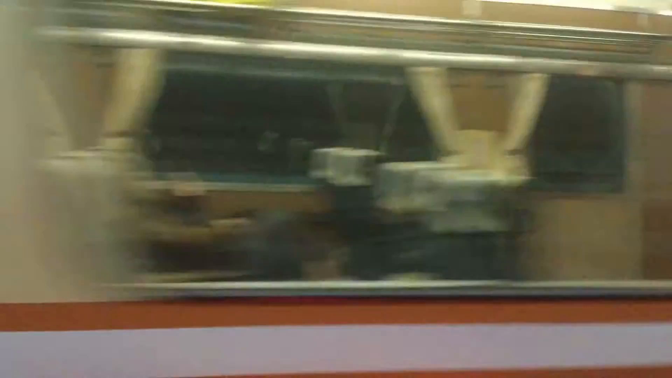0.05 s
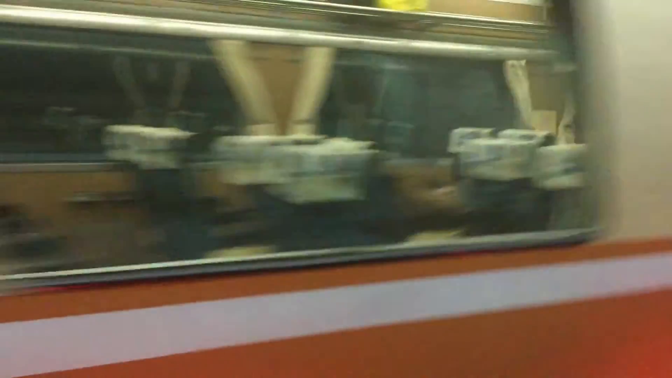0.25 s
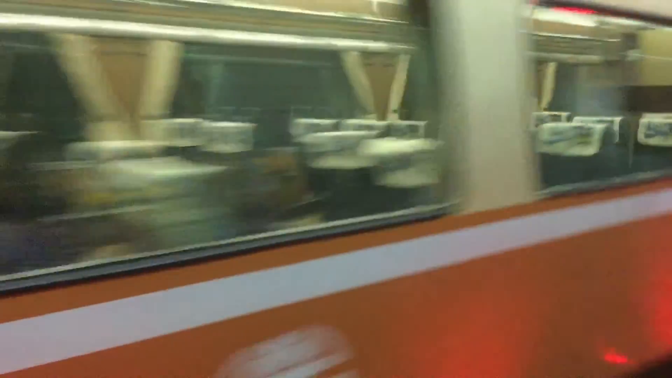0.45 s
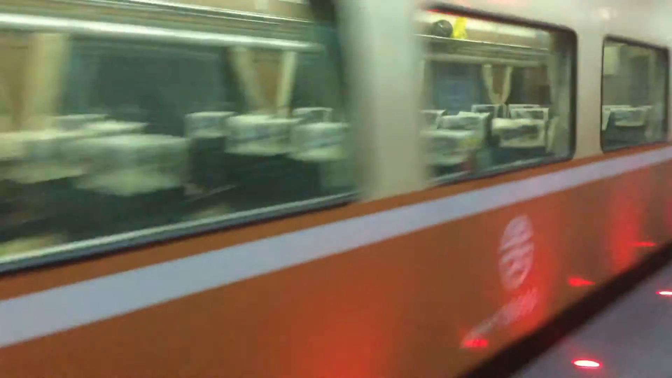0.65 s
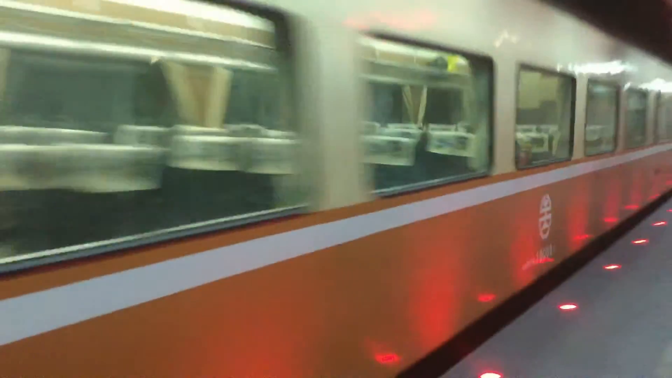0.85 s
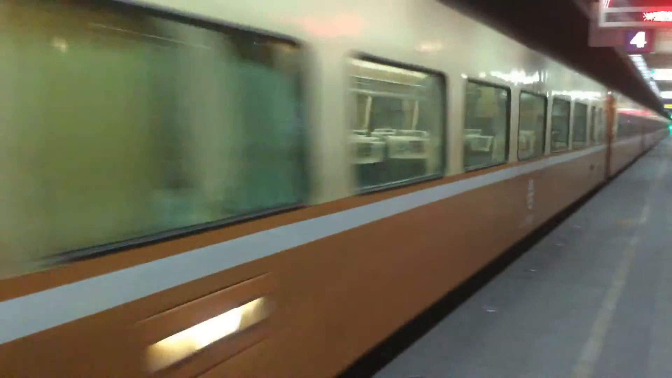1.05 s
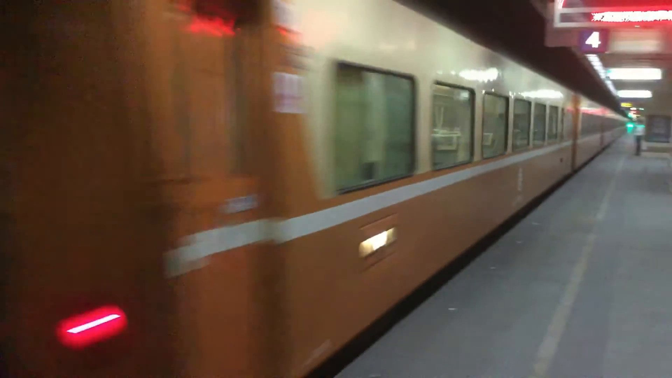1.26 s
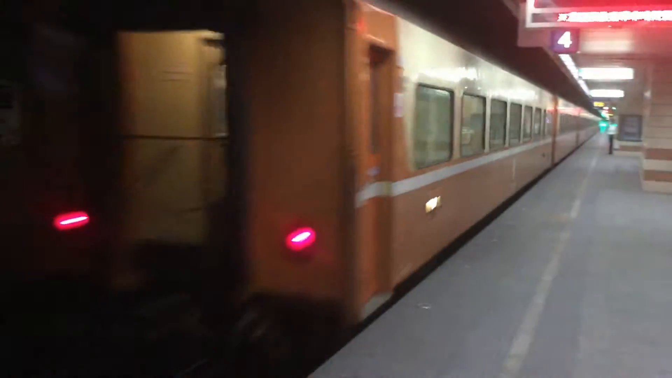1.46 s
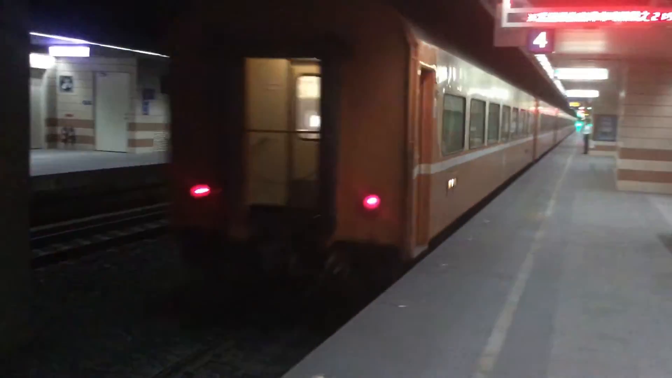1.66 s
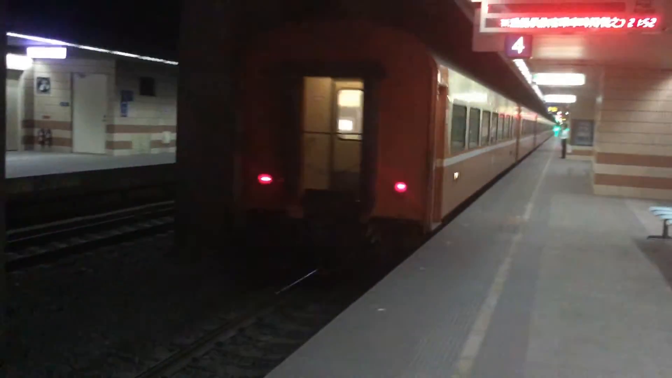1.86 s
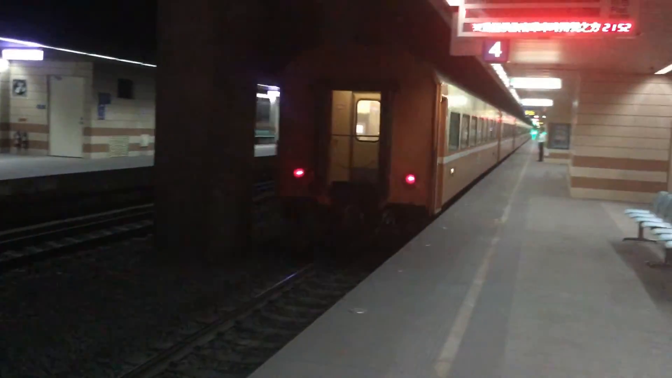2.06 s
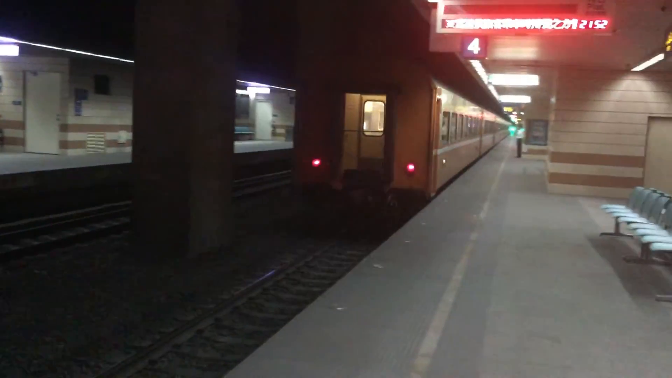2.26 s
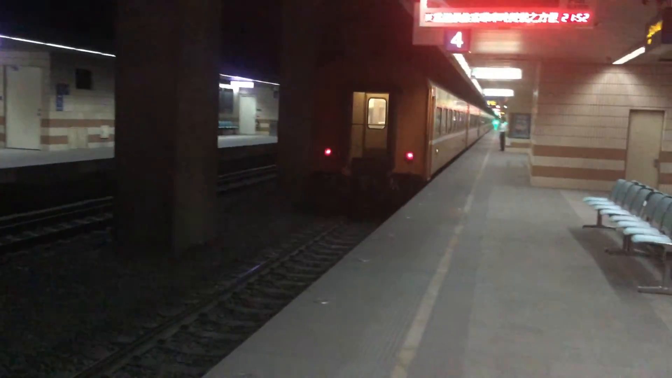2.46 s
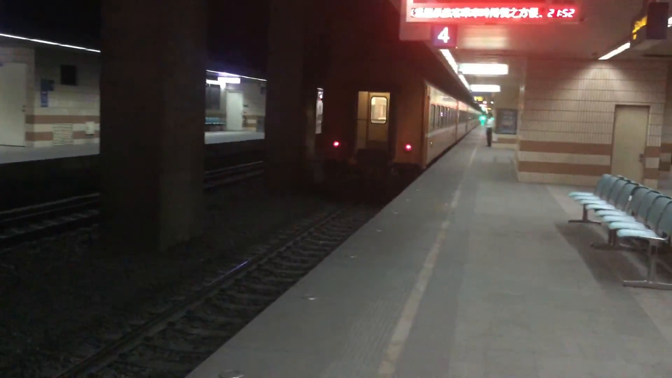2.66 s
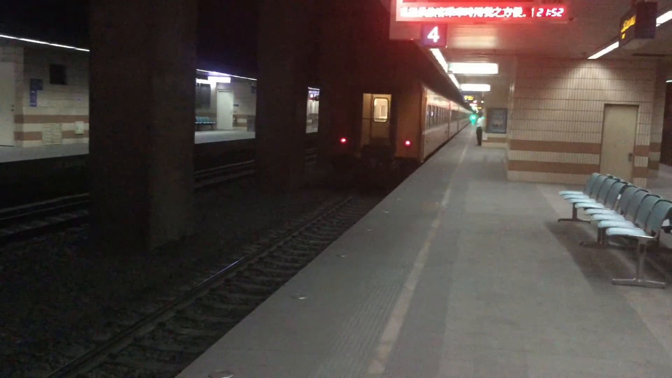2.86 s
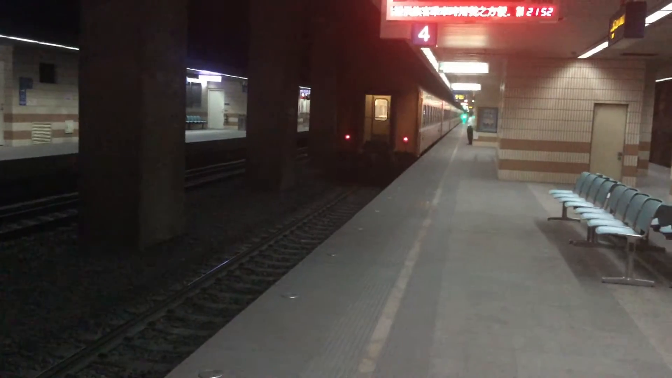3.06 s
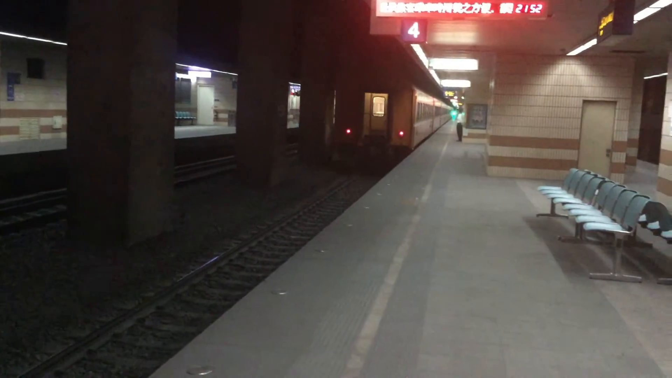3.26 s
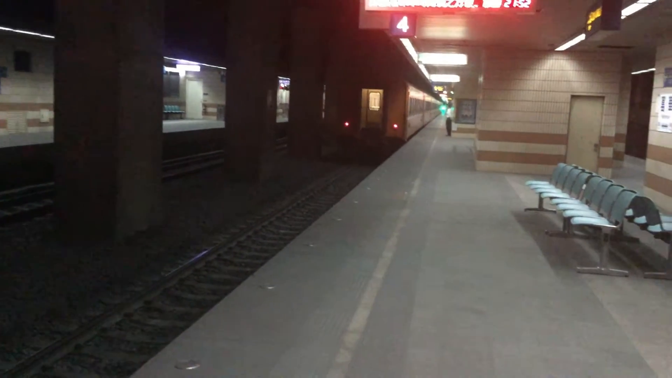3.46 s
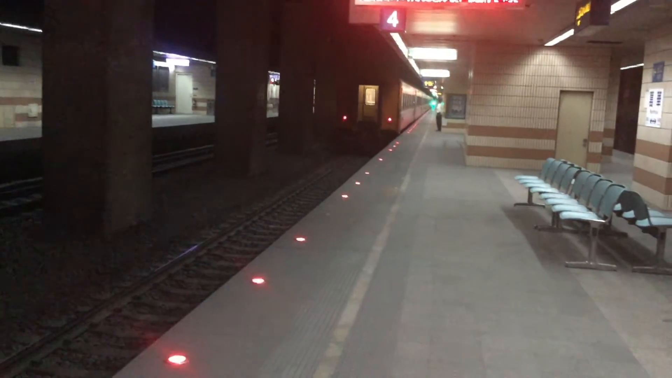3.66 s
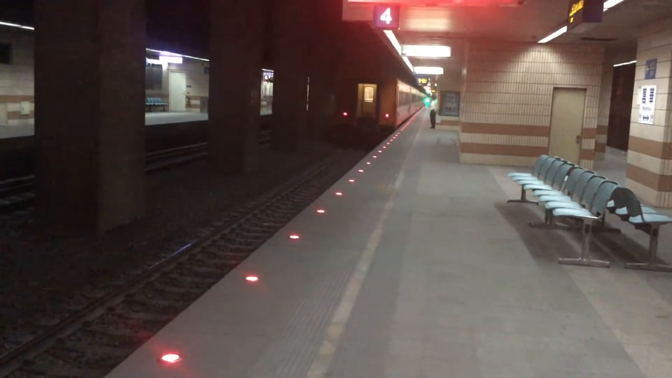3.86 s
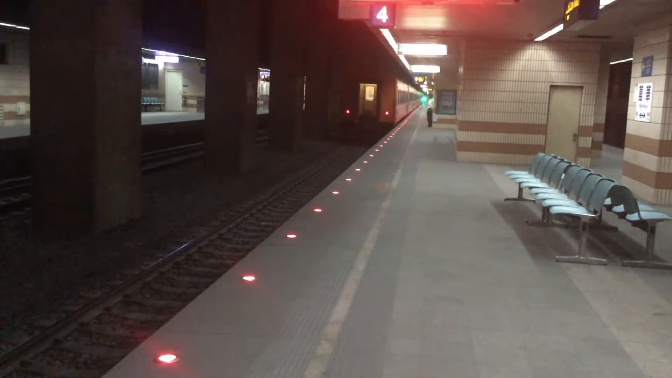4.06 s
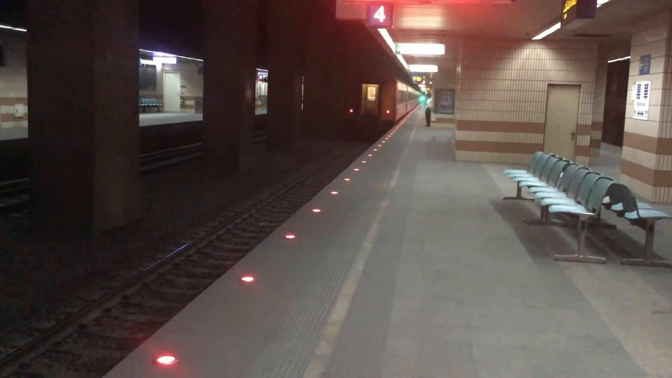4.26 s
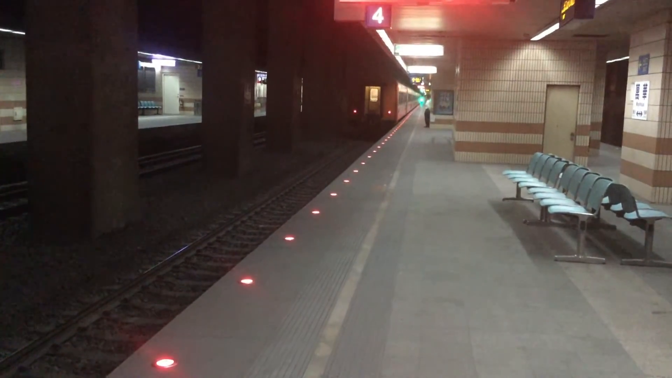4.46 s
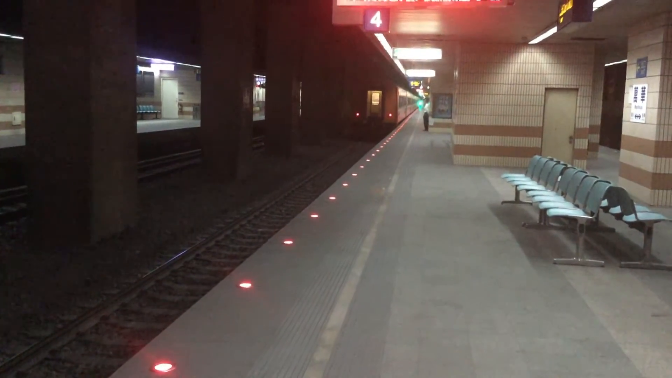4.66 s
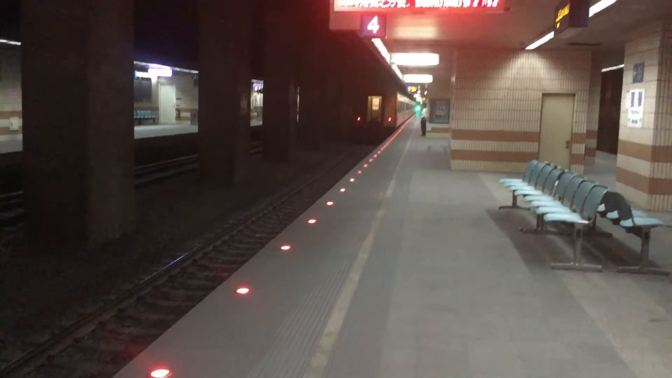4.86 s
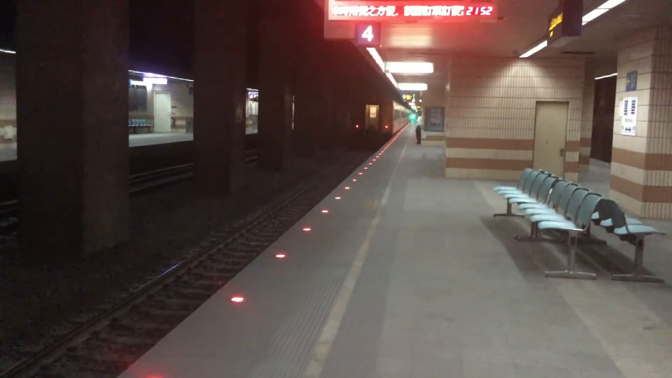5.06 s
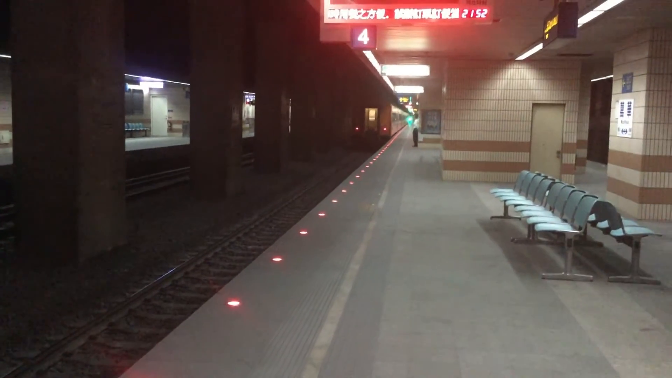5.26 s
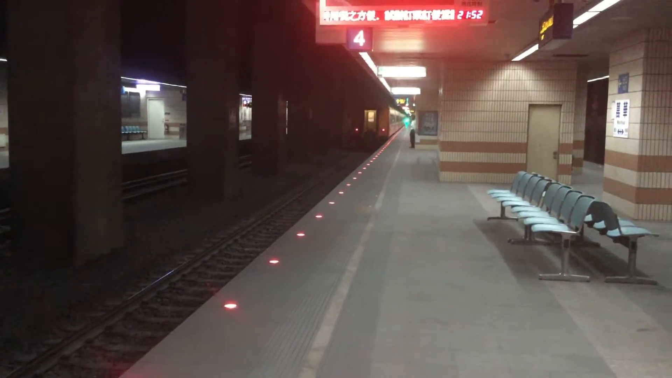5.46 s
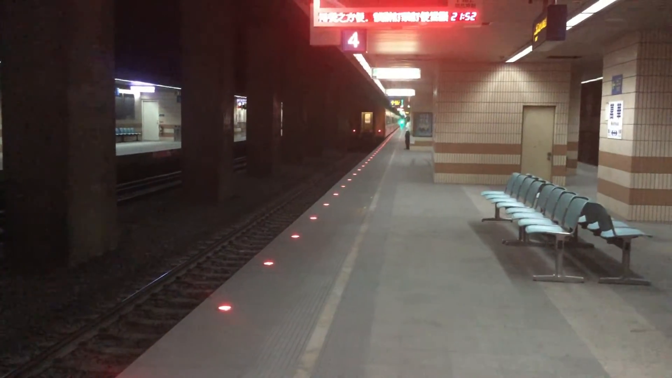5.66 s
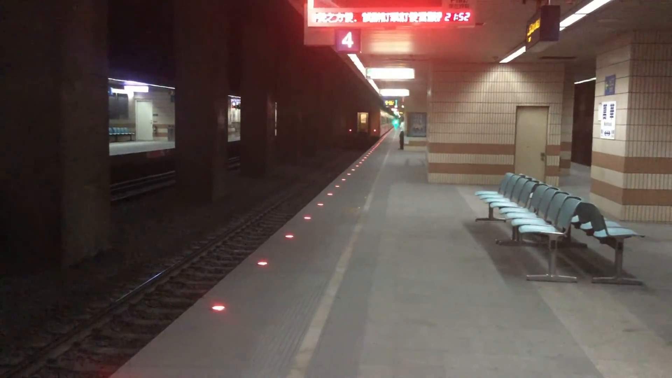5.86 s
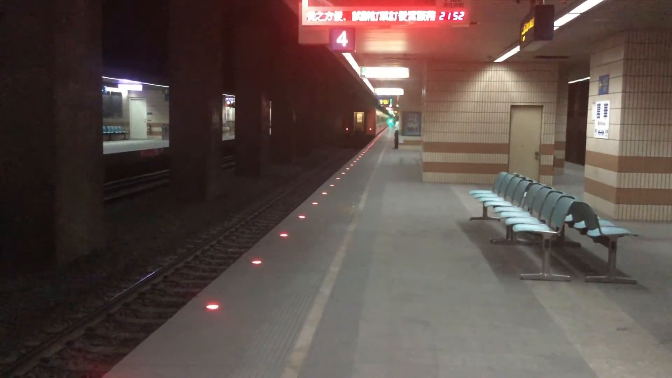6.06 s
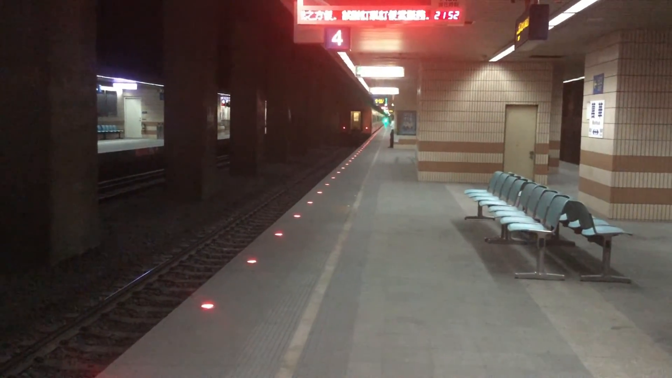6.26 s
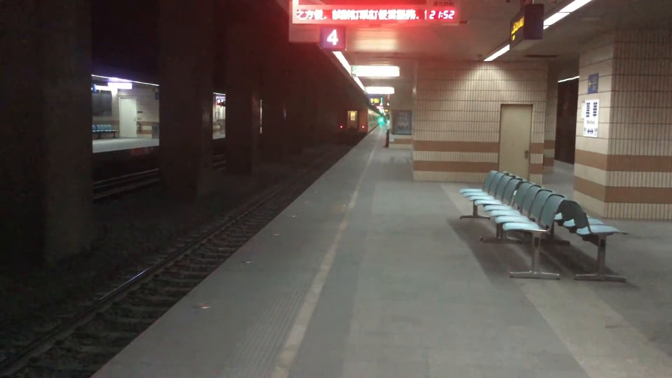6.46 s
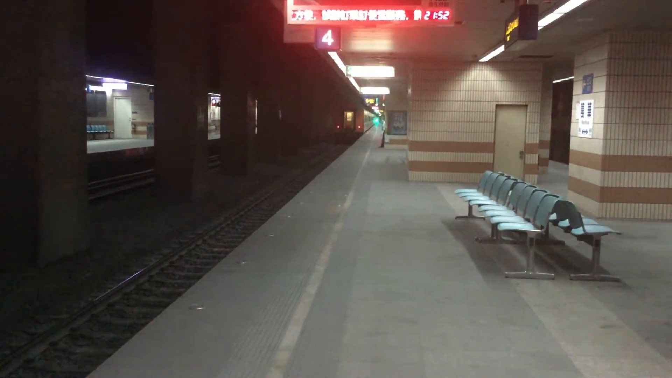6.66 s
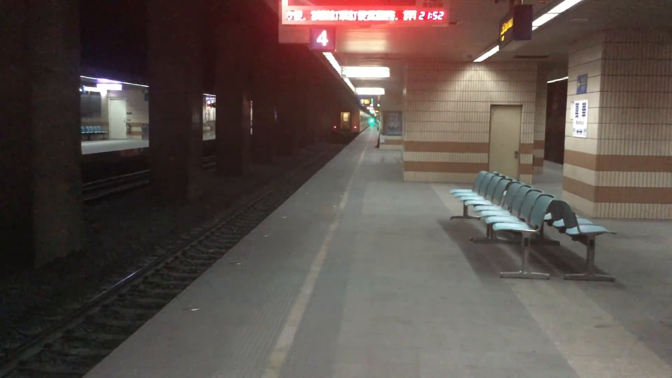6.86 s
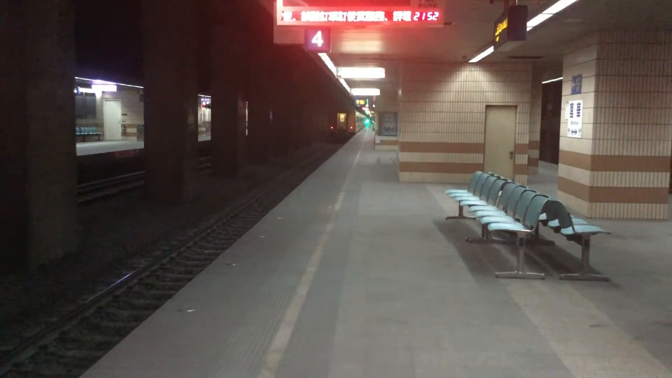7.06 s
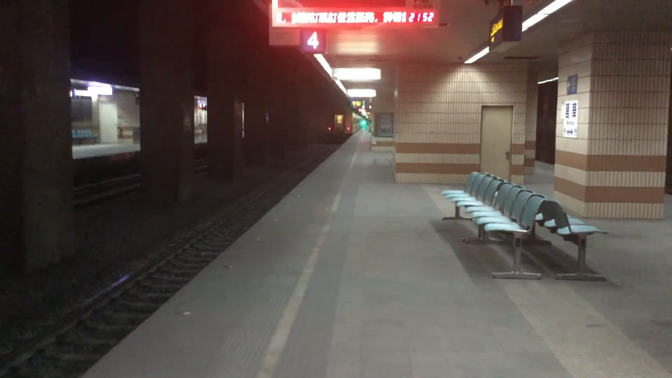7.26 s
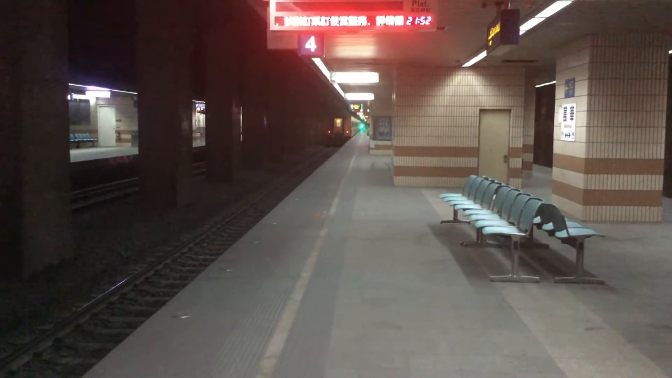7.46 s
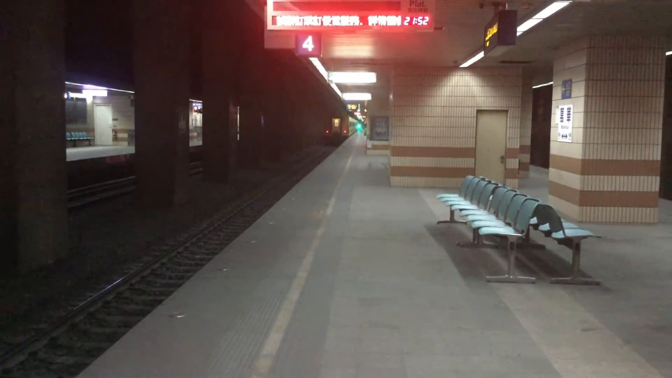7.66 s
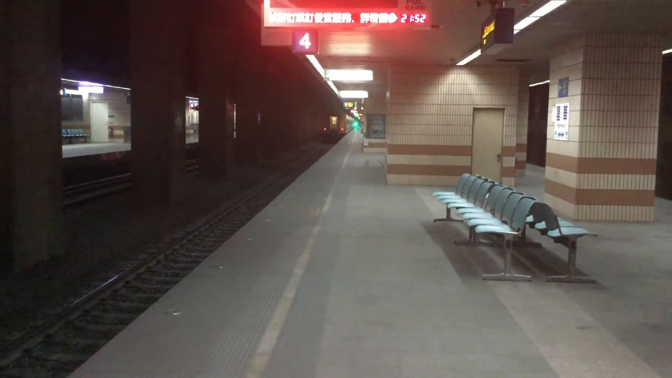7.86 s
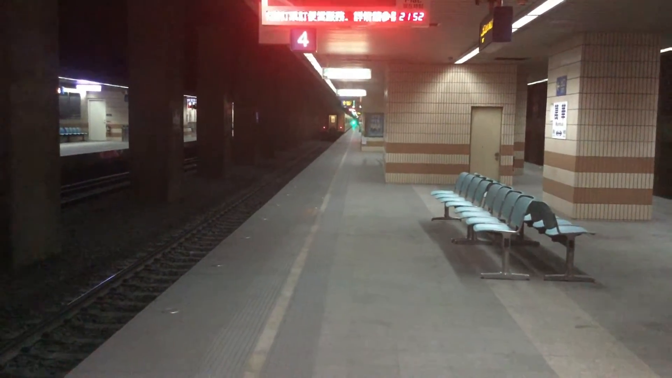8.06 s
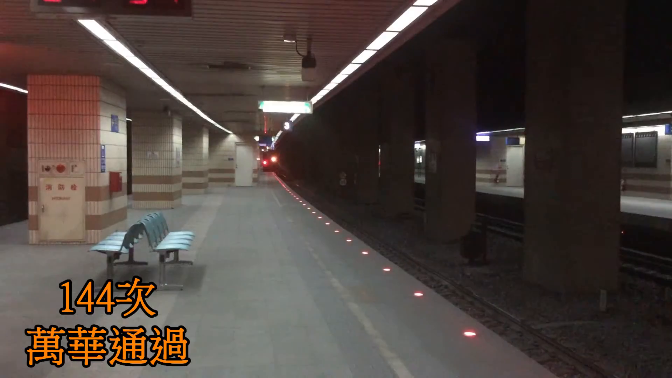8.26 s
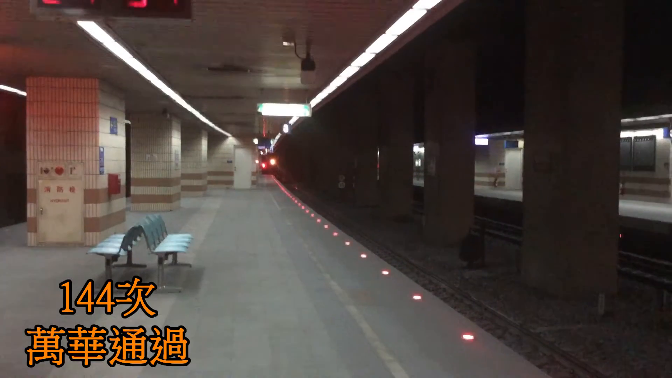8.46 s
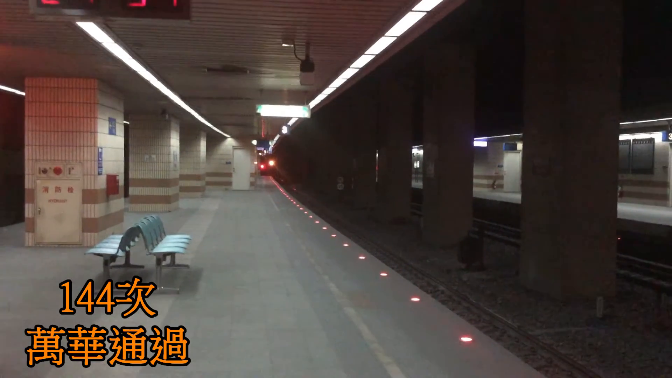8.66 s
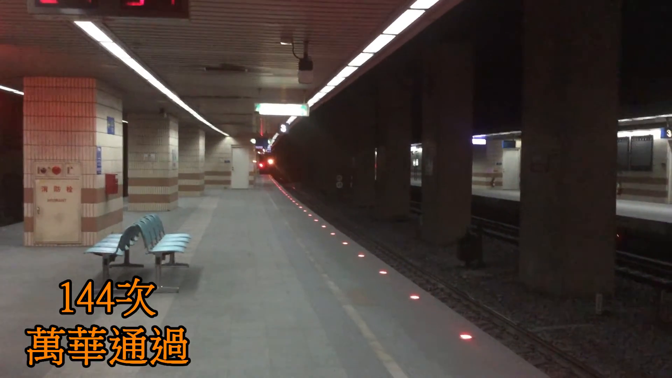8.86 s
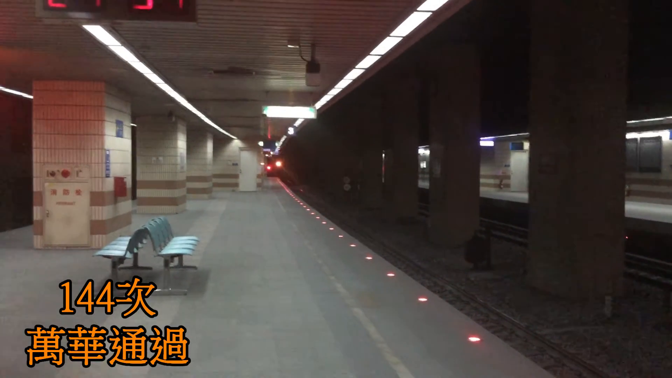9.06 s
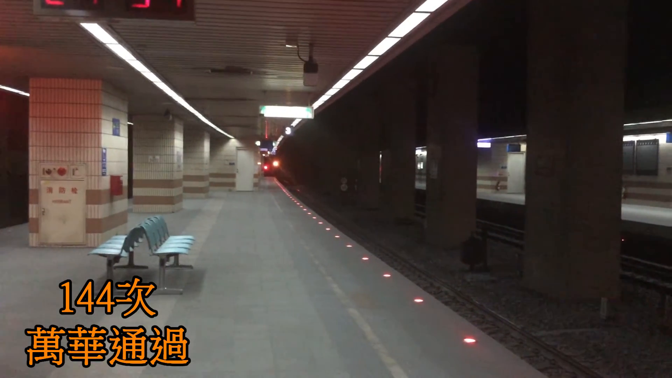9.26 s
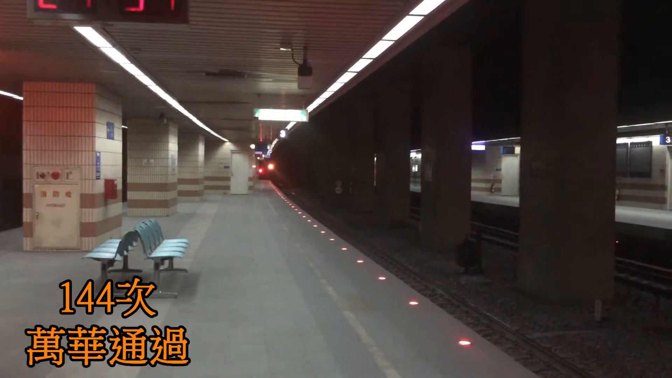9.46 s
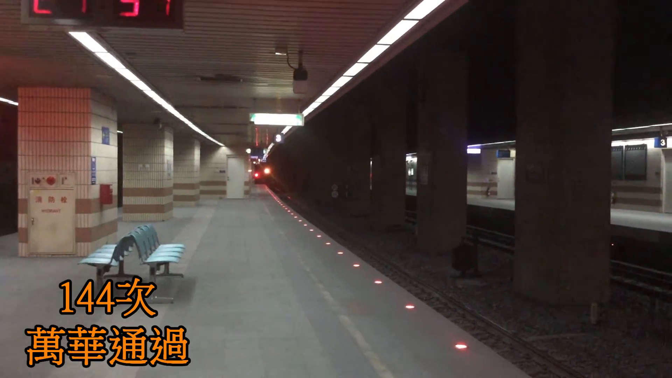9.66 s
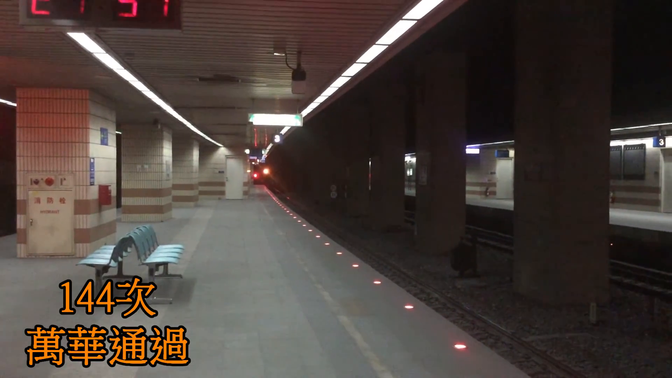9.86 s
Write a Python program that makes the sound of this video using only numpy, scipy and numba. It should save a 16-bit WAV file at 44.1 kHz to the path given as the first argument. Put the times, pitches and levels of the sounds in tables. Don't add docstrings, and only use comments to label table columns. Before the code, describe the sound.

From the start, a train's last cars roar past at close range in an underground station, a dense low-mid rolling noise with blurred singing wheel tones. Air whirling behind it thumps and flutters against the microphone, strongest until about 2 s, with brief high air puffs near 0.6, 0.75 and 1.35 s. The rear passes around 1.4 s; the roar then sinks unevenly, dropping clearly after 3 s, while wind thuds continue at 3.6 and 5.3 s, and more sparsely later. Thin, very high brake hiss remains, with air puffs around 4.6-5.7 s. Two tiny ticks come near 7.97 s. At 8.22 s everything cuts to a very brief silence. From 8.26 s a far quieter, dull train roll booms in the tunnel over faint ventilation hiss and hum. Metal knocks tap around 8.9 s; at 9.3 s a stronger low knock and sudden swell arrive, then it eases until about 9.9 s.

```python
import sys
import numpy as np
from scipy import signal
from scipy.fft import rfft, irfft, next_fast_len
from scipy.io import wavfile
from scipy.ndimage import uniform_filter1d
from numba import njit

SR = 44100
rng = np.random.default_rng(int(sys.argv[2]) if len(sys.argv) > 2 else 0)


def generate_wav(signal):
    frames = np.transpose(np.atleast_2d(signal))
    scaled = np.clip(frames, -1, 1) * 32767
    pcm = np.round(scaled).astype(np.int16)
    wavfile.write(sys.argv[1], SR, pcm)


def natural_amplitude(level_db):
    exponent = np.asarray(level_db, float) / 20
    return 10 ** exponent


N = 437451
FIRST_ENDS_S, SECOND_STARTS_S = 8.2163, 8.2638

# t/s, level/dB
LEAVING_LEVEL = [(0, -0.5), (.3, -0.5), (.64, -1), (1.3, -0.5), (1.42, 1), (2.1, -1), (2.45, -2.5),
                 (3.15, -4), (3.55, -7), (4.6, -9), (4.9, -8.5), (5.45, -11.5), (5.76, -10.5),
                 (6.05, -12.5), (6.9, -12.5), (7.4, -14), (7.8, -15.5), (8.21, -15.5)]
# level at the passing/dB, loss for each dB the train fades/dB
LEAVING_PARTS = [
    (-25, 1.39),
    (-29.5, 1.3242),
    (-34, 1.0),
    (-43.5, 1.44),
]
# f/Hz, level per Hz/dB
LEAVING_COLOUR = [(15, -42), (25, -26), (91, -1.5), (253, -1.5), (389, -12), (632, -11.5), (872, -13.5),
                  (1710, -13), (2010, -14), (2360, -17), (2630, -18.5), (3940, -23.5), (8830, -35),
                  (12200, -36.5), (15500, -40)]
# f/Hz, width/Hz, level over wheel and rail/dB
WHEEL_TONES = [(1142, 185, -8.5), (1748, 115, -9.5), (2390, 150, -11), (2816, 116, -18.5),
               (3083, 200, -13.5), (3867, 370, -16), (4410, 140, -23), (4767, 145, -19.5),
               (5210, 440, -21.5), (6740, 370, -29.5), (8490, 410, -30.5), (9450, 400, -30.5)]
# t/s, level/dB
LEAVING_SQUEAL = [(0, -72), (2, -70), (3.5, -68), (5, -65.5), (6, -65), (8.21, -65.5)]


def leaving():
    roar, (_, _, rail_db, _) = rolling(follow(LEAVING_LEVEL, LEAVING_PARTS), LEAVING_COLOUR, 0.95, 0.38)
    near = np.clip((rail_db + 38.5) / 14, 0, 1)
    singing = rings(WHEEL_TONES, 1.4, 7, blur=1.28 + .5 * near, drift_hz=22)
    singing_db = rail_db + 5.0 - 0.67 * near
    return roar + natural_amplitude(singing_db) * singing + natural_amplitude(-4.5 * near) * squeal(LEAVING_SQUEAL, -1.0)


def follow(curve, parts):
    s, db = np.transpose(curve)
    return np.column_stack([s] + [rest_db + share * db for rest_db, share in parts])


# lowest f/Hz, highest f/Hz
PART_EDGES = [
    (60, 330),
    (400, 900),
    (1000, 5000),
    (6000, 11000),
]
PART_REACH = [60, 330, 400, 900, 1000, 2300, 4300, 11000]


def rolling(curve, colour, swell_db, flicker_db):
    s, *parts = np.transpose(curve)
    grid = np.arange(10, 16000, 5)
    hz_points, db_points = np.transpose(colour)
    power = natural_amplitude(np.interp(np.log(grid), np.log(hz_points), db_points)) ** 2
    usual_db = [10 * np.log10(power[(grid > lo) & (grid < hi)].sum()) for lo, hi in PART_EDGES]
    places = np.log(PART_REACH)
    swell = walk(9) + 0.59 * walk(35)
    out = 0
    for hz in 32 * 2 ** np.arange(0, 9.1, .5):
        def shape(f):
            slice_gain = np.cos(np.pi * np.clip(np.log2(f / hz), -.5, .5))
            return slice_gain * np.sqrt(np.interp(f, grid, power))
        shares = [np.interp(np.log(hz), places, np.repeat(row, 2)) for row in np.eye(len(PART_EDGES))]
        lead_db = sum(w * (p - u) for w, p, u in zip(shares, parts, usual_db))
        band_db = lead_db + 10 * np.log10(np.sum(shape(grid) ** 2))
        moving_db = np.interp(clock(), s, band_db) + swell_db * swell + flicker_db * walk(12)
        out = out + natural_amplitude(moving_db) * noise(shape)
    return out, [np.interp(clock(), s, p) for p in parts]


def rings(modes, patchy_db, rate, blur=1, drift_hz=14):
    out = 0
    for hz, width_hz, db in modes:
        width = width_hz * blur * np.ones(N)
        centre = np.clip(hz + drift_hz * walk(rate), 30, .45 * SR)
        ring = svf(svf(rng.standard_normal(N), centre, width), centre, width)
        level = natural_amplitude(db + patchy_db * walk(rate))
        out = out + level * ring / np.sqrt(np.pi / 2 * width / SR)
    return out


# f/Hz, width/Hz, level/dB
BRAKE_TONES = [(10400, 300, -15), (11600, 250, -8), (12050, 440, 3.5), (13850, 300, -14)]


def squeal(curve, hiss_db):
    hiss = natural_amplitude(hiss_db) * noise(lambda f: 1 / (1 + ((f - 14300) / 1500) ** 2))
    return natural_amplitude(np.interp(clock(), *np.transpose(curve))) * (rings(BRAKE_TONES, 1.1, 25) + hiss)


# t/s, length/s, level/dB, f/Hz
BOGIES = [
    (0.71, 0.55, -28.5, 280),
    (0.79, 0.28, -40, 3200),
    (1.45, .65, -41.5, 3040),
    (1.4, 0.73, -41.5, 2350),
    (2.404, 0.144, -33, 190),
    (3.848, 0.18, -37.5, 273),
    (1.25, 1.9, -61, 11430),
]
BOGIE_EDGE_S, BOGIE_WIDTH_SHARE, BOGIE_WIDTH_HZ = 0.056, .04, 46


def bogies():
    out = 0
    for s, length, db, hz in BOGIES:
        inside_s = np.minimum(clock() - s, s + length - clock())
        on = np.clip(inside_s / BOGIE_EDGE_S + .5, 0, 1)
        width_hz = min(BOGIE_WIDTH_HZ + BOGIE_WIDTH_SHARE * hz, 240)
        out = out + on * rings([(hz, width_hz, db)], 2.6, 14)
    return out


# t/s, peak level/dB, f/Hz
STRONG_EDDIES = [(0.669, -13, 198), (0.974, -10.5, 236), (1.0, -12, 308), (1.413, -12, 152),
                 (1.485, -11.5, 156), (2.16, -16.5, 253), (3.457, -18, 202), (3.582, -12, 183.7),
                 (3.656, -19, 180), (3.991, -18, 110), (4.156, -19, 220), (4.188, -17.5, 200),
                 (4.413, -19, 216), (4.519, -16.5, 111), (4.551, -21, 92), (5.066, -15.5, 230),
                 (5.1, -24, 202), (5.205, -16.5, 244), (5.265, -16, 85), (5.336, -15, 107),
                 (5.356, -19, 109), (5.393, -13.5, 268), (5.925, -20, 220), (5.954, -21.5, 120),
                 (6.0, -18.5, 153), (6.052, -17, 311), (6.495, -21.5, 110), (6.668, -21.5, 86.4),
                 (6.977, -26, 169), (7.433, -26, 100)]


def slipstream(turns=0.59):
    out, t = np.zeros(N + SR), np.arange(-2000, 2000) / SR
    eddies = STRONG_EDDIES + small_eddies()
    for (s, db, hz), (start, slide) in zip(eddies, rng.random((len(eddies), 2))):
        cycles = hz * t
        phase = start + cycles + 0.034 * (slide - .5) * cycles ** 2
        eddy = np.exp(-(cycles / turns) ** 2 / 2) * np.cos(2 * np.pi * phase)
        at = int(s * SR)
        out[at:at + len(t)] += natural_amplitude(db - 1.5) * eddy
    return out[len(t) // 2:][:N]


EDDIES_PER_S, EDDY_SPREAD_DB, EDDY_SPREAD_OCTAVES = 36, 3.0, 0.54


def small_eddies():
    count = int(EDDIES_PER_S * FIRST_ENDS_S)
    late, chance = rng.random(count), rng.standard_normal((count, 2))
    s = (np.arange(count) + late) / EDDIES_PER_S
    db, hz = wind(s)
    eddy_db = db + EDDY_SPREAD_DB * chance[:, 0].clip(-3, 1.2)
    eddy_hz = np.clip(hz * 2 ** (EDDY_SPREAD_OCTAVES * chance[:, 1]), 80, 420)
    return list(zip(s, eddy_db, eddy_hz))


PUSH_DB, PUSH_DB_PER_OCTAVE = -10, -7


def gust():
    s = np.arange(0, FIRST_ENDS_S + .1, .005)
    db, hz = wind(s)
    push_db = np.interp(clock(), s, db + PUSH_DB + PUSH_DB_PER_OCTAVE * np.log2(hz / 110))
    return natural_amplitude(push_db + 2.5 * walk(24.77)) * noise(lambda f: 1 / (1 + ((f - 60) / 25) ** 2))


# t/s, length/s, peak level of small whirls/dB, their usual f/Hz
GUSTS = [(0, 0.4, -16, 173), (0.514, 0.2, -16.5, 188), (0.745, 0.26, -19.5, 230), (0.942, 0.26, -16.5, 143),
         (1.23, 0.17, -20, 197), (1.583, 0.12, -18, 121), (1.854, 0.26, -27, 129), (2.589, .09, -20, 114),
         (2.781, 0.37, -32, 192), (3.364, .2, -24, 132), (3.594, 0.13, -21.5, 143), (3.753, .29, -28, 140),
         (4.125, 0.096, -27, 130), (4.288, 0.15, -23, 220), (4.474, .09, -21, 100), (4.61, 0.08, -27, 148),
         (4.777, 0.32, -30, 223), (5.04, .1, -22, 150), (5.168, 0.27, -22.5, 107), (5.496, .05, -28, 110),
         (5.65, .05, -27, 168), (5.92, 0.15, -24.5, 129), (6.125, 0.45, -28.5, 137), (6.48, .12, -31, 120),
         (6.628, 0.087, -23.5, 100), (6.84, .25, -34, 100), (7.33, 0.13, -34.5, 120),
         (7.53, .07, -29.5, 131), (7.854, 0.48, -33, 126)]
CALM_DB, CALM_FADE_DB_PER_S, CALM_HZ, GUST_EDGE_S = -30, 2, 100, 0.016


def wind(t):
    power = natural_amplitude(CALM_DB - CALM_FADE_DB_PER_S * t) ** 2
    pitch = power * np.log(CALM_HZ)
    for s, length, db, hz in GUSTS:
        inside_s = np.minimum(t - s, s + length - t)
        on = natural_amplitude(db) ** 2 * np.clip(inside_s / GUST_EDGE_S + .5, 0, 1) ** 2
        power = power + on
        pitch = pitch + on * np.log(hz)
    return 10 * np.log10(power), np.exp(pitch / power)


# t/s, level/dB
COMING_LEVEL = [(8.27, 1.5), (8.7, -0.5), (8.95, 0.8), (9.302, 2), (9.32, 13.5), (9.46, 7.5), (9.51, 11.5),
                (9.76, 6), (9.92, 3)]
# level far off/dB, gain for each dB of swell/dB
COMING_PARTS = [
    (-42, 0.57),
    (-49, 1.03),
    (-51.5, 0.99),
    (-74, 0.67),
]
# f/Hz, level per Hz/dB
COMING_COLOUR = [(15, -70), (25, -14), (98, -9), (135, -6), (174, -5.5), (265, -4.5), (395, -10.5),
                 (425, -9.5), (734, -4.5), (1670, -17), (2300, -18), (2670, -22), (4980, -28.5),
                 (9500, -54), (12400, -92), (20900, -120)]
# f/Hz, width/Hz, level over rumble/dB
TUNNEL_TONES = [
    (116, 17, -24),
    (192, 52, -11.5),
    (257, 44, -6.5),
]


def coming():
    roar, (rumble_db, *_) = rolling(follow(COMING_LEVEL, COMING_PARTS), COMING_COLOUR, 0.25, 0.43)
    boom = natural_amplitude(rumble_db + 3.0) * rings(TUNNEL_TONES, 3.4, 6.2, drift_hz=5.1)
    return roar + boom + squeal(far_squeal(), -12)


# t/s, level over its idle graze/dB
CATCHES = [
    (8.88, 11.5),
    (9.11, 13.5),
    (9.14, 11),
    (9.56, 13),
]
FAR_SQUEAL_DB, CATCH_RISE_S, CATCH_FADE_DB_PER_S = -95, .015, 130


def far_squeal():
    s = np.arange(FIRST_ENDS_S, N / SR + .01, .005)
    over = []
    for at, db in CATCHES:
        rise = db * np.clip((s - at) / CATCH_RISE_S, 0, 1)
        fade = CATCH_FADE_DB_PER_S * np.clip(s - at - CATCH_RISE_S, 0, None)
        over.append(rise - fade)
    return np.column_stack([s, FAR_SQUEAL_DB + np.max(over, axis=0).clip(0)])


# t/s, level/dB, length/s, lowest f/Hz, fade/dB per s
PUFFS = [(.6, -58, .15, 13500, 110), (.75, -55, .2, 13000, 110), (1.35, -56, .12, 13500, 110),
         (4.63, -57, .08, 13500, 90), (4.93, -64, .15, 13500, 110), (5.74, -58, .09, 13300, 100),
         (8.858, -70, .04, 13300, 220), (9.03, -82, .1, 13800, 150), (9.522, -73, .03, 14100, 220),
         (9.71, -79, .025, 14000, 250), (9.765, -75.5, .035, 14000, 250)]


def puffs():
    out = 0
    for s, db, length, low_hz, fade_db in PUFFS:
        t = clock() - s
        swell = np.clip(t / .012, 0, 1) * natural_amplitude(-fade_db * np.clip(t - length, 0, 2))
        air = noise(lambda f: 1 / (1 + (low_hz / f) ** 40 + (f / 15800) ** 80))
        out = out + natural_amplitude(db) * swell * air
    return out * natural_amplitude(1.5 * walk(40))


# t/s, peak level/dB, f/Hz, time to fade by 60 dB/s
TICKS = [
    (7.965, -44, 8400, .025),
    (7.987, -51, 8400, .025),
    (8.89, -73.5, 10000, .1),
    (8.925, -38, 1450, 0.098),
    (8.95, -48.5, 1570, .06),
    (8.978, -39, 1490, .09),
    (9.312, -37, 2350, .06),
    (9.338, -24, 750, 0.073),
    (9.485, -44, 2980, .15),
    (9.56, -68, 10050, .1),
]


def ticks():
    out = 0
    for s, db, hz, t60 in TICKS:
        t = np.clip(clock() - s, 0, None)
        attack = np.minimum(t / t60 * 12, 1)
        out = out + attack * natural_amplitude(db - 60 * t / t60) * np.sin(2 * np.pi * hz * t)
    return out


# f/Hz, level per Hz/dB
STATION_COLOUR = [(2350, -32), (4000, -7.5), (5250, -18), (7640, -16), (9270, -11), (10300, -15),
                  (15500, -21)]


def station():
    hz, db = np.transpose(STATION_COLOUR)
    hum = natural_amplitude(-52.5 + 2.5 * walk(7)) * noise(lambda f: 1 / (1 + ((f - 52) / 18) ** 2))
    hiss = natural_amplitude(-70) * noise(lambda f: natural_amplitude(np.interp(np.log(f), np.log(hz), db)))
    return hiss + hum


def fading(x, patchy_db, width_hz, hold_s):
    cells = signal.stft(x, nperseg=1024, noverlap=768)[2]
    tall = max(round(width_hz * 1024 / SR), 1)
    wide = max(round(hold_s * SR / 256), 1)
    chance = uniform_filter1d(rng.standard_normal(cells.shape), tall, axis=0)
    chance = uniform_filter1d(chance, wide, axis=1)
    gain = natural_amplitude(patchy_db * chance / np.std(chance))
    gain = gain / np.sqrt(np.mean(gain ** 2))
    return signal.istft(cells * gain, nperseg=1024, noverlap=768)[1][:N]


def clock():
    return np.arange(N) / SR


def walk(rate):
    k = int(SR / rate)
    steps = np.repeat(rng.standard_normal(N // k + 1), k)
    return 1.08 * uniform_filter1d(uniform_filter1d(steps, k), k)[:N]


def noise(shape):
    size = next_fast_len(N)
    white = rfft(rng.standard_normal(size))
    hz = np.arange(len(white)) * SR / size + 1e-3
    x = irfft(white * shape(hz), size)[:N]
    return x / np.std(x)


@njit
def svf(x, hz, width):
    y, band, low = np.empty(len(x)), 0., 0.
    for i in range(len(x)):
        g, k = np.tan(np.pi * hz[i] / SR), width[i] / hz[i]
        v = (band + g * (x[i] - low)) / (1 + g * (g + k))
        band = 2 * v - band
        low = low + 2 * g * v
        y[i] = k * v
    return y


def scene():
    first = fading(leaving(), 1.62, 130, .035) + slipstream() + gust()
    second = fading(coming() + station(), 2.6, 130, .035)
    trains = np.where(clock() < (FIRST_ENDS_S + SECOND_STARTS_S) / 2, first, second)
    return (trains + puffs() + ticks() + bogies())[None]


def band_limit(x):
    return signal.sosfilt(signal.butter(12, 15680, fs=SR, output="sos"), x)


def record(dry):
    heard = signal.sosfilt(signal.butter(2, 55, "high", fs=SR, output="sos"), dry)
    fade_in = np.clip((clock() - SECOND_STARTS_S) * 800, 0, 1)
    gate = np.where(clock() < FIRST_ENDS_S, 1, fade_in)
    return band_limit(heard * gate)


dry = scene()
out = record(dry)
generate_wav(out)
```